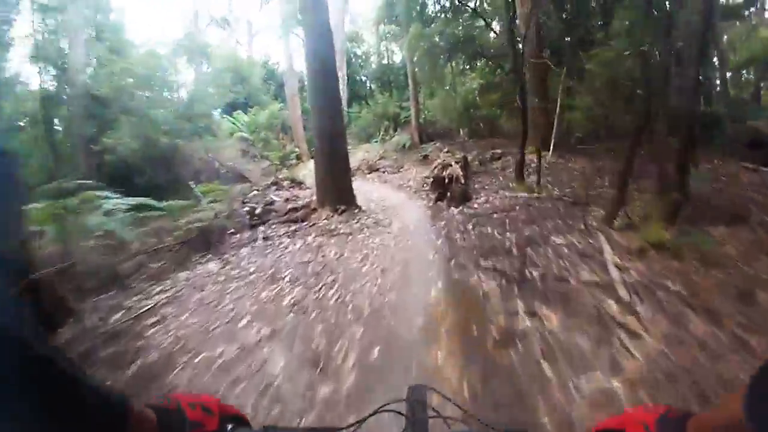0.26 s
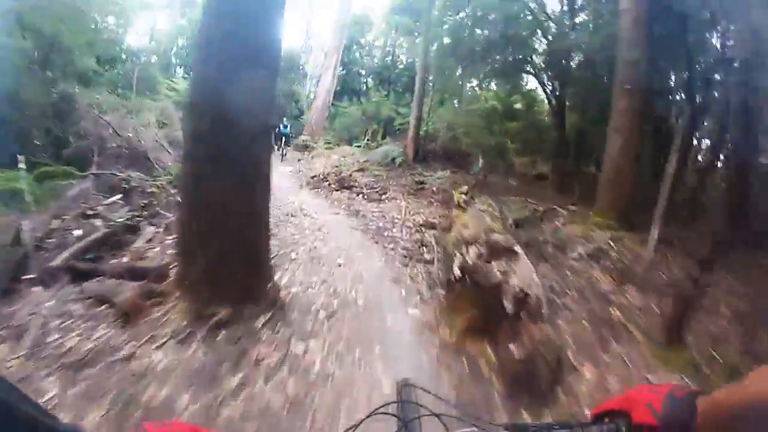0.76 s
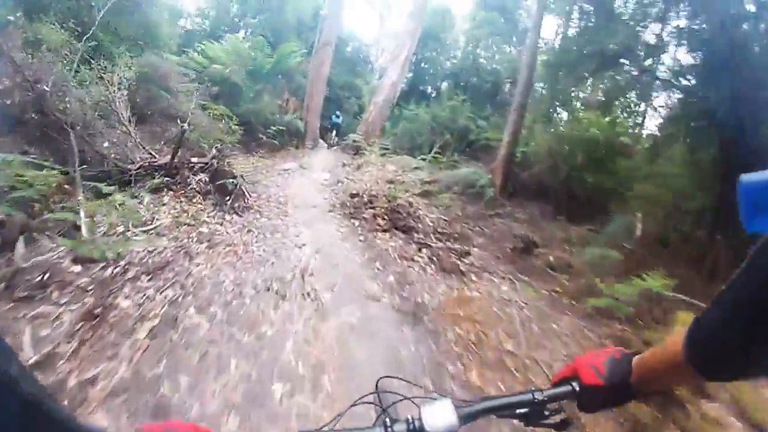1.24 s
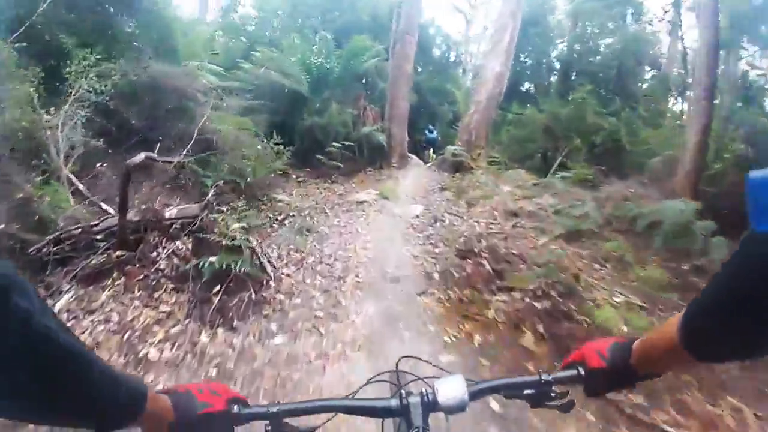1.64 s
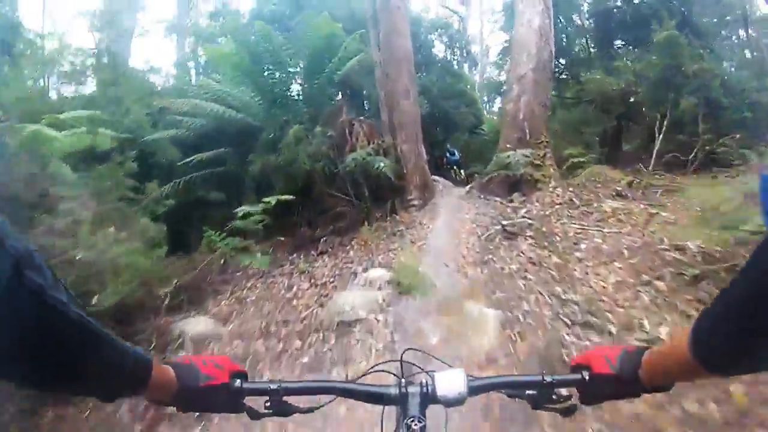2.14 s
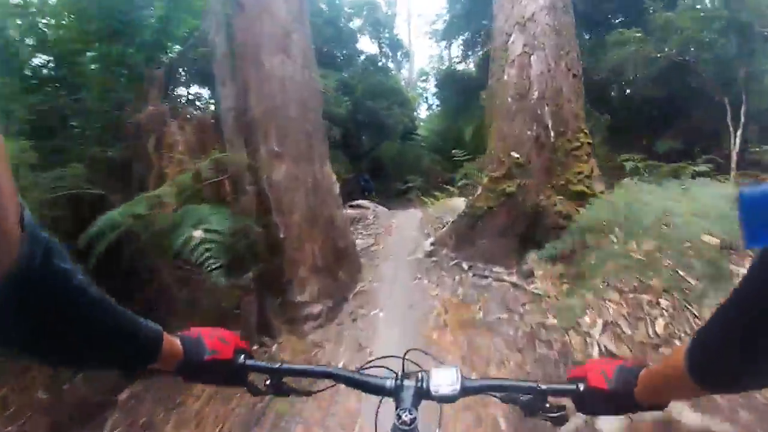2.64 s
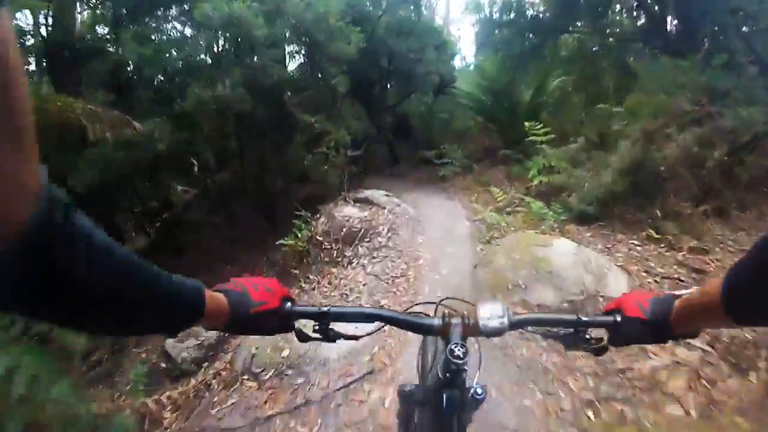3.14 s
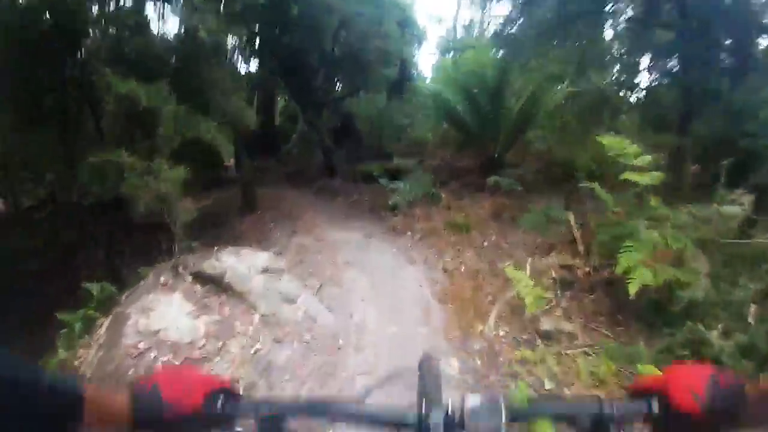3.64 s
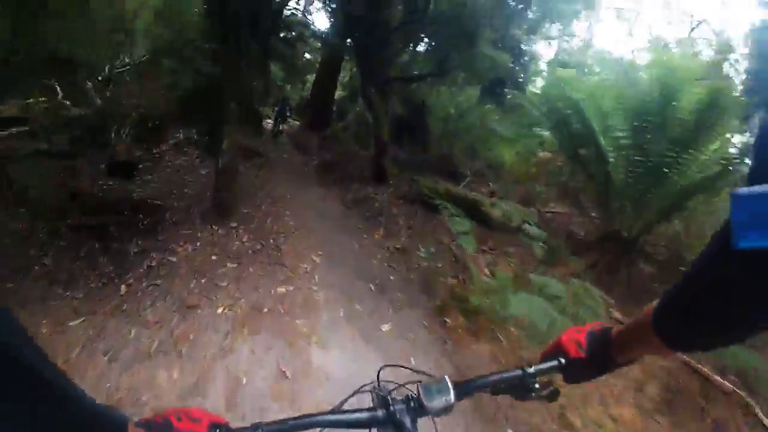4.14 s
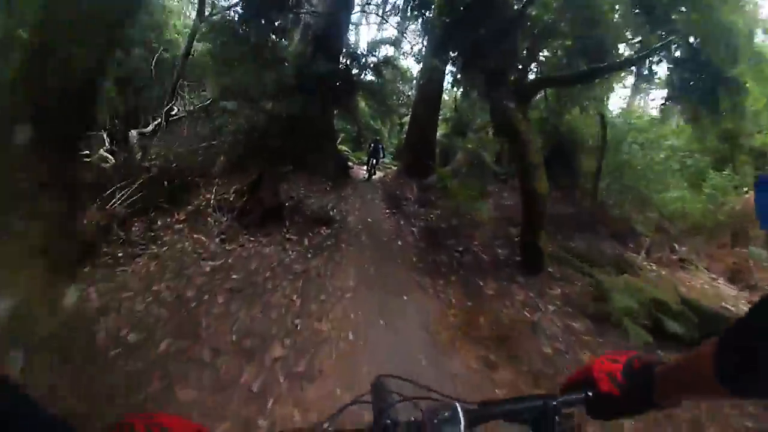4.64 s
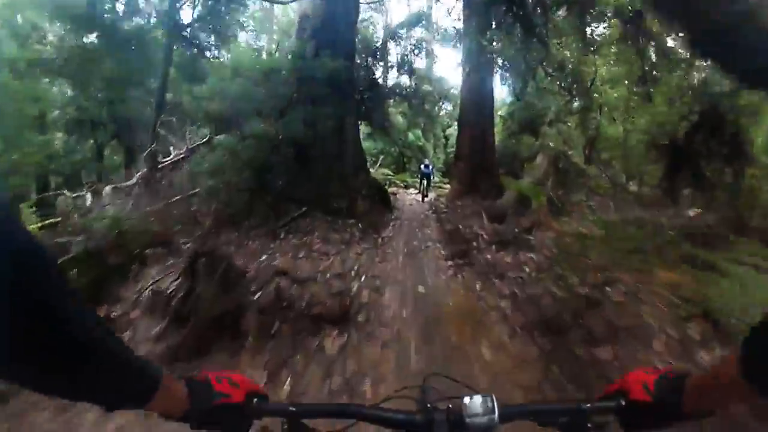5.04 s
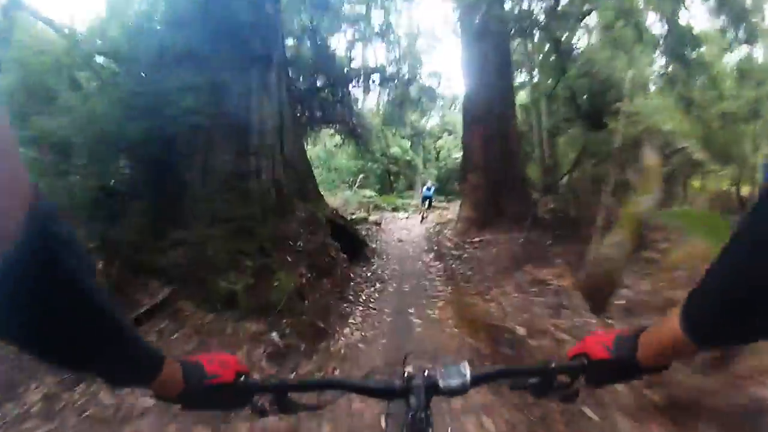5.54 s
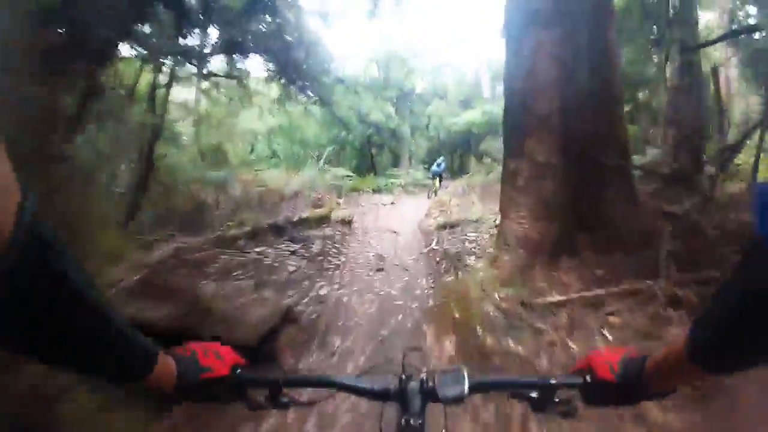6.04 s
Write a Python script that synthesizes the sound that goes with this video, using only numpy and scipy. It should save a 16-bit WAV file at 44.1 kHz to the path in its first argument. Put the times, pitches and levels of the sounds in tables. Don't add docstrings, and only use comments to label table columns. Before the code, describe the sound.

Deep muffled rumble of a bicycle on a dirt trail, with crunching grit, small ticks and one hard boxy knock past the middle.

```python
import sys
import numpy as np
from scipy import signal
from scipy.fft import rfft, irfft
from scipy.io import wavfile

SR = 44100
rng = np.random.default_rng(int(sys.argv[2]) if len(sys.argv) > 2 else 0)


def materialize(psi):
    bounded = np.clip(np.atleast_2d(psi).T, -1, 1)
    quanta = np.round(bounded * 32767).astype(np.int16)
    wavfile.write(sys.argv[1], SR, quanta)


def volts_from_db(level):
    exponent = np.asarray(level, float) / 20
    return 10 ** exponent


N = 277256

# frequency in Hz, level in dB.
HISS_SPECTRUM = [(1530, -23), (2600, -0.5), (2990, -10), (3460, -22), (3890, -9.5), (5790, -7), (8610, -14),
                 (10800, -14), (15000, -17.5)]
HISS_DB = -65.5
# pitch in Hz, rms level in dB.
WHINES = [(6955, -83.5), (7014, -84), (9771, -101), (10427, -85), (10492, -87.5), (11746, -93),
          (13964, -92)]

# frequency in Hz, level in dB per Hz.
SHAKE_SPECTRUM = [(4.7, -19), (8.0, 2), (22, -1.5), (43, -20.5), (60, -20), (78, -55), (130, -120)]
SHAKE_GAIN_DB = 3.0
# frequency in Hz, level in dB per Hz.
ROLL_SPECTRUM = [(28, -25), (45, -8.5), (75, 1), (118, -3), (160, -14.5), (280, -21), (373, -24.5),
                 (526, -25.5), (630, -28.5), (900, -31), (1200, -29.5), (1560, -50)]
ROLL_DB, ROLL_FOLLOWS_GRIT, ROLL_FOLLOWS_SHAKE = -47.5, 0.15, 0.067
STIR_GAIN, STIR_SETTLE_S, BEAT_STIRS = 14.6, 0.06, 0.62
# centre in seconds, half length in seconds, change in dB.
RUTS = [
    (1.533, 0.039, -4.5),
    (3.846, 0.076, 7.5),
    (1.998, 0.13, 3),
    (2.4, 0.13, 3.5),
    (3.097, 0.64, -2),
    (4.206, 0.064, 1),
    (4.843, 0.22, -2.5),
    (5.756, 0.17, 1.5),
]
# start in seconds, tyre grit in dB, body shaking in dB.
TRAIL = [(0, -54, -28.5), (.14, -56, -35.5), (.29, -52.5, -40), (.99, -59, -33.5), (1.11, -53, -37.5),
         (1.5, -55, -34), (2.15, -57.5, -33), (2.7, -55, -32.5), (2.9, -50, -30), (3.1, -58, -33),
         (3.47, -58, -30), (3.62, -47.5, -30), (3.95, -54, -32), (4.2, -54.5, -40.5), (4.52, -51.5, -37),
         (4.95, -57, -37), (5.7, -60, -30), (5.98, -53.5, -26.5)]
BRIGHT_DB, BRIGHT_FOLLOWS_GRIT = -64.5, 0.57

# frequency in Hz, width in Hz, level in dB.
CASE_LOW = [(1010, 580, -20), (1415, 169, 1), (2098, 322, -3), (2335, 438, -8)]
# frequency in Hz, width in Hz, level in dB.
CASE_HIGH = [(3388, 365, 2.5), (4686, 720, -4.5), (5010, 250, 1), (5760, 340, 3), (6500, 160, -0.5),
             (7340, 930, -6.5)]

BEAT_DB = [-21.5, -23, -23.5, -22, -21.5, -19.5, -20.5, -23.5, -20, -32, -19.5, -22.5, -25.5, -23.5, -22,
           -38]
FIRST_BEAT_S, BEAT_PERIOD_S = 0.3145, 0.3793
BEAT_HZ, BEAT_SAG_HZ_PER_S = 46.1, 0.51

# start in seconds, end in seconds, pitch in Hz, width in Hz, level in dB.
SQUEALS = [
    (0.493, 0.67, 5010, 160, -67),
    (0.717, 0.97, 5010, 160, -67.5),
    (1.932, 2.037, 906, 30, -66),
    (2.074, 2.135, 924, 30, -64),
    (3.592, 3.696, 3500, 800, -62),
    (5.697, 5.765, 980, 25, -62),
    (0.271, 0.337, 2020, 130, -53.5),
    (.32, 0.37, 2150, 110, -57),
    (4.342, 4.453, 2000, 500, -52.5),
]
# start in seconds, peak in dB, pitch in Hz.
TICKS = [(0.0258, -49, 5700), (0.217, -49, 4960), (0.3177, -56, 5920), (0.5034, -45, 5760),
         (0.5217, -48, 5050), (0.633, -51, 5910), (0.652, -51, 4980), (0.858, -57, 5020),
         (1.0959, -58, 5690), (1.2384, -54, 5840), (1.757, -47, 5750), (3.024, -47, 4290),
         (3.035, -48, 5760), (3.0794, -58, 7000), (3.1545, -49.5, 6360), (3.2926, -60, 4890),
         (3.3724, -37, 5760), (3.6278, -32.5, 6070), (3.6354, -31, 6200), (3.7973, -64, 4580),
         (4.118, -55, 5760), (4.786, -36, 5560), (4.9223, -54, 5540), (5.222, -40, 6160),
         (5.3373, -50, 5670), (5.4056, -51, 5690), (5.5165, -46.5, 5920), (5.841, -48.5, 5800),
         (5.9715, -46, 4160), (6.0033, -41.5, 5780)]
TICK_GAIN_DB, TICK_T60_S = 2.5, 0.019
CRACK_DB, CRACK_FOLLOWS = -61.5, 0.24
# start in seconds, peak in dB, pitch in Hz, crack compared with peak in dB, 60 dB decay in seconds.
RATTLE = [
    (3.7255, -37, 5800, -13, .03),
    (3.726, -33, 3600, -19, .03),
    (3.733, -42, 5000, -16, .015),
    (3.7484, -36, 3500, -25, .016),
    (3.7482, -37, 6400, -12, .014),
    (3.7515, -39, 6400, -22, .02),
]
# start in seconds, peak in dB.
STONES = [(0.192, -38), (0.2284, -31), (0.416, -38.5), (0.6564, -40.5), (0.7115, -39), (0.7352, -45),
          (0.7964, -44), (1.3817, -35), (1.7587, -39.5), (2.3334, -41), (2.387, -41), (2.4553, -35.5),
          (2.8165, -41), (2.8744, -39), (3, -38), (3.2194, -41.5), (3.2894, -35), (3.3242, -41.5),
          (3.3742, -36), (3.6287, -37), (3.6845, -62), (3.918, -36.5), (3.982, -44), (4.0888, -42),
          (4.1342, -40), (4.1924, -42), (5.3933, -37), (6.0462, -44), (6.109, -48)]
# start in seconds, level in dB.
SLIP = [
    (3.7235, -33),
    (3.7272, -23),
    (3.7315, -29),
    (3.742, -35),
]
STONE_S, SLIP_S = 0.0021, 0.001

# time in seconds, height in dB, half length in seconds, direction.
JOLTS = [(0.089, -22.5, 0.014, -1), (3.457, -21, 0.0071, -1), (3.561, -19.5, 0.0061, 1),
         (3.583, -21, 0.0046, 1), (3.653, -18, 0.0026, -1), (3.73, -10, 0.0084, 1),
         (3.918, -12.5, 0.006, -1), (5.906, -13, 0.0064, -1), (5.953, -18, 0.012, 1),
         (5.976, -11.5, 0.0044, -1), (5.992, -16.5, 0.0022, 1), (6.001, -13.5, 0.0063, 1),
         (6.103, -21, 0.012, 1), (6.199, -20, 0.01, -1), (6.209, -19, 0.019, 1)]
# start in seconds, wall jump in dB, direction, sag time in seconds, ring in dB.
KNOCKS = [
    (3.7472, .3, -1, .0062, -10.5),
    (5.9794, -17, 1, .003, -34),
]
KNOCK_RISE_S = 0.001
# pitch in Hz, level in dB, 60 dB decay in seconds.
KNOCK_MODES = [(586, -14, 0.028), (1175, -24, 0.025), (1437, -2, 0.011), (1820, -1, 0.006),
               (2095, -8, 0.017)]
# pitch in Hz, level in dB, 60 dB decay in seconds.
THUD_MODES = [(284, -30.5, 0.021), (510, -24, 0.021), (1020, -32, 0.017)]
THUD_AT_S = 5.9795
DUCK_AT_S, DUCK_DB, HOLD_S, RELEASE_DB_PER_S = 3.753, -21, 0.022, 150


def rms_one(x):
    return x / np.sqrt(np.mean(x ** 2) + 1e-20)


def in_time(rows):
    s, *columns = np.transpose(rows)
    return [np.interp(np.arange(N) / SR, s, column) for column in columns]


def coloured(points):
    hz, db = np.transpose(points)
    bins_hz = np.maximum(np.arange(N // 2 + 1) * SR / N, 1)
    gain = volts_from_db(np.interp(np.log(bins_hz), np.log(hz), db))
    return rms_one(irfft(rfft(rng.standard_normal(N)) * gain, N))


def drift(rate_hz):
    r = np.exp(-2 * np.pi * rate_hz / SR)
    wander = signal.lfilter([1], [1, -2 * r, r * r], rng.standard_normal(N + SR))
    return rms_one(wander[SR:])


def resonance(x, hz, width_hz):
    r = np.exp(-np.pi * width_hz / SR)
    feedback = [1, -2 * r * np.cos(2 * np.pi * hz / SR), r * r]
    return signal.lfilter(np.array([1, 0, -1]) * (1 - r * r) / 2, feedback, x)


def double_resonance(x, hz, width_hz):
    return resonance(resonance(x, hz, width_hz), hz, width_hz)


def case(x, modes):
    return sum((-1) ** k * volts_from_db(db) * double_resonance(x, hz, 1.69 * width)
               for k, (hz, width, db) in enumerate(modes))


def ringing(modes, t):
    return sum(volts_from_db(db - 60 * t / t60) * np.sin(2 * np.pi * hz * t) for hz, db, t60 in modes)


def add(out, s, piece):
    at = round(s * SR)
    out[at:at + len(piece)] += piece[:N - at]


def electronics():
    t = np.arange(N) / SR
    hiss = volts_from_db(HISS_DB + 1.6 * drift(14)) * coloured(HISS_SPECTRUM)
    waver = np.cumsum(2.14 * drift(4.9)) / SR / 7000
    whine = sum(volts_from_db(db + 5 + 0.53 * drift(3.7)) * np.sin(2 * np.pi * hz * (t + waver)) for hz, db in WHINES)
    chatter = rms_one(case(rng.standard_normal(N), [(9480, 440, 0)]))
    return hiss + whine + volts_from_db(-81.0 + 3.5 * drift(6.6)) * chatter


def beats():
    out = np.zeros(N)
    t = np.arange(-0.05, 0.07, 1 / SR)
    bell = np.where(t < 0, np.exp(-(t / 0.014) ** 4), np.exp(-(t / 0.018) ** 2))
    slowed = t - 13.8 * t ** 2 * (t < 0.04)
    for k, db in enumerate(BEAT_DB):
        s = FIRST_BEAT_S + k * BEAT_PERIOD_S
        hz = BEAT_HZ - BEAT_SAG_HZ_PER_S * s
        add(out, s + t[0], volts_from_db(db) * bell * np.cos(2 * np.pi * hz * slowed))
    return out


def squeals():
    out = np.zeros(N)
    for start, end, hz, width, db in SQUEALS:
        tone = rms_one(double_resonance(rng.standard_normal(SR), hz, width))
        tone = tone[SR // 2:][:round((end - start) * SR)]
        level = volts_from_db(db + 4.0 * drift(43)[:len(tone)])
        add(out, start, level * tone * np.sqrt(np.hanning(len(tone))))
    return out


def ticks():
    out = np.zeros(N)
    t = np.arange(1800) / SR
    crisp = signal.butter(2, [4500, 10500], "band", fs=SR, output="sos")
    contacts = []
    for s, db, hz in TICKS:
        crack_db = CRACK_DB + CRACK_FOLLOWS * (db + 47.5) - db
        contacts.append((s, db + TICK_GAIN_DB, hz, crack_db, TICK_T60_S))
    for s, db, hz, crack_db, t60 in contacts + RATTLE:
        attack = np.minimum(t / 0.00074, 1)
        burst = rng.standard_normal(len(t)) * volts_from_db(-60 * t / t60) * attack
        rattle = double_resonance(burst, hz, 1500)
        crack = signal.sosfilt(crisp, burst)
        add(out, s, volts_from_db(db + 7.5) * rattle + volts_from_db(db + crack_db + 10.5) * crack)
    return out


def stones():
    taps = [(s, db, STONE_S) for s, db in STONES]
    taps += [(s, db - 2.0, SLIP_S) for s, db in SLIP]
    hits = np.zeros(N) + 1e-18
    t = np.arange(600) / SR
    for s, db, length in taps:
        scuff = rng.standard_normal(len(t)) * np.exp(-t / length)
        heard_peak = np.abs(case(scuff, CASE_LOW)).max()
        add(hits, s, volts_from_db(db) * scuff / heard_peak)
    return case(hits, CASE_LOW)


def jolts():
    out = np.zeros(N)
    t = np.arange(-0.05, 0.05, 1 / SR)
    for s, db, half, direction in JOLTS:
        add(out, s + t[0], np.sign(direction) * volts_from_db(db) * np.exp(-(t / half) ** 2))
    return out


def knocks():
    out = np.zeros(N)
    t = np.arange(4000) / SR
    jump = t ** 2 / (t ** 2 + KNOCK_RISE_S ** 2)
    late = np.hypot(np.maximum(t - 3.6 * KNOCK_RISE_S, 0), 0.001)
    ring = ringing(KNOCK_MODES, t)
    for s, step_db, direction, fall, ring_db in KNOCKS:
        wall = volts_from_db(step_db) * jump * np.exp(-late / fall)
        add(out, s, np.sign(direction) * (wall - volts_from_db(ring_db) * ring))
    add(out, THUD_AT_S, ringing(THUD_MODES, t))
    return signal.sosfilt(signal.butter(10, 2380, fs=SR, output="sos"), out + 1e-18)


def rumble(grit_swing, shake_db, pulse, bumps):
    settle = np.exp(-1 / (STIR_SETTLE_S * SR))
    push = np.abs(bumps) + BEAT_STIRS * np.abs(pulse)
    stir = 1 + STIR_GAIN * signal.lfilter([1 - settle], [1, -settle], push)
    ruts_db = sum(db * np.exp(-((np.arange(N) / SR - s) / half) ** 2) for s, half, db in RUTS)
    shake_swing = shake_db - shake_db.mean()
    roll_db = ROLL_DB + ruts_db + ROLL_FOLLOWS_GRIT * grit_swing + ROLL_FOLLOWS_SHAKE * shake_swing
    shake = volts_from_db(shake_db + SHAKE_GAIN_DB + 2.0 * drift(5.6)) * coloured(SHAKE_SPECTRUM)
    return shake + stir * volts_from_db(roll_db + 2.02 * drift(15.5)) * coloured(ROLL_SPECTRUM)


def grit(per_s, spread_db, smooth, flicker_db):
    sizes = volts_from_db(spread_db * np.minimum(rng.exponential(1, N), 4)) * rng.choice([-1, 1], N)
    chance = per_s * volts_from_db(5 * drift(25)) / SR
    grains = sizes * (rng.random(N) < chance)
    lumps = volts_from_db(flicker_db * (drift(19.0) + 0.49 * drift(43)))
    return lumps * (rms_one(grains) + smooth * rng.standard_normal(N))


def tyres(tyre_db, grit_swing):
    crunch = grit(per_s=700, spread_db=4.0, smooth=1.4, flicker_db=1.57)
    dull = rms_one(case(crunch, CASE_LOW))
    bright = rms_one(case(crunch * volts_from_db(1.14 * drift(44)), CASE_HIGH))
    return volts_from_db(tyre_db) * dull + volts_from_db(BRIGHT_DB + BRIGHT_FOLLOWS_GRIT * grit_swing) * bright


def ducking():
    after = np.arange(N) / SR - DUCK_AT_S
    back_db = np.minimum(DUCK_DB + RELEASE_DB_PER_S * np.maximum(after - HOLD_S, 0), 0)
    return volts_from_db(back_db * np.clip(after / 0.0066, 0, 1))


def scene():
    tyre_db, shake_db = in_time(TRAIL)
    grit_swing = tyre_db - tyre_db.mean()
    pulse = beats()
    bumps = jolts() + knocks()
    steady = electronics() + squeals() + rumble(grit_swing, shake_db, pulse, bumps) + tyres(tyre_db, grit_swing)
    return (ducking() * steady + pulse + bumps + stones() + ticks())[None]


def roll_off(x):
    return signal.sosfilt(signal.butter(12, 15190, fs=SR, output="sos"), x)


def record(dry):
    return roll_off(dry)


dry = scene()
out = record(dry)
materialize(out)
```